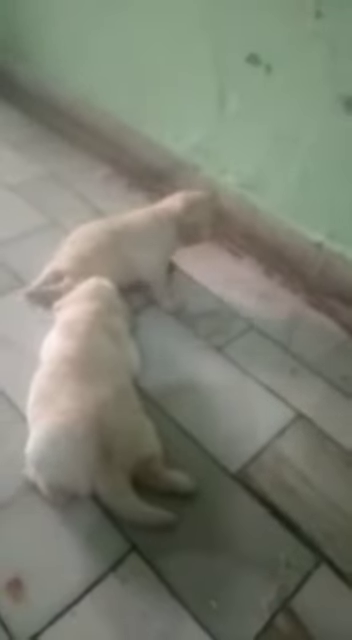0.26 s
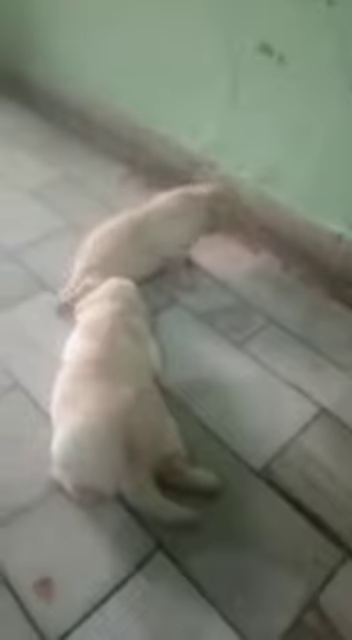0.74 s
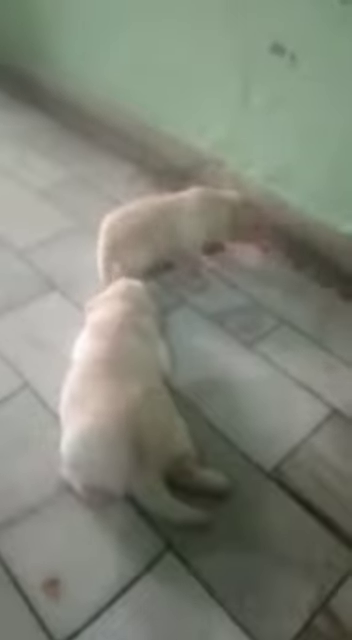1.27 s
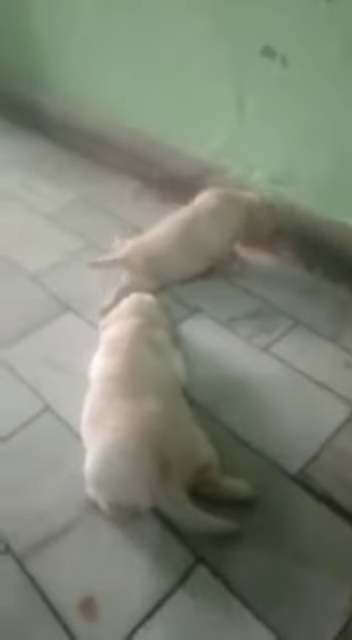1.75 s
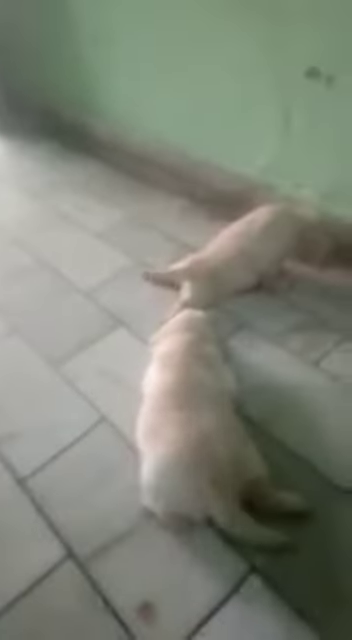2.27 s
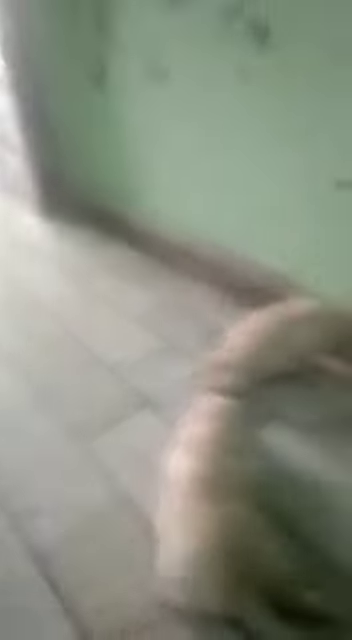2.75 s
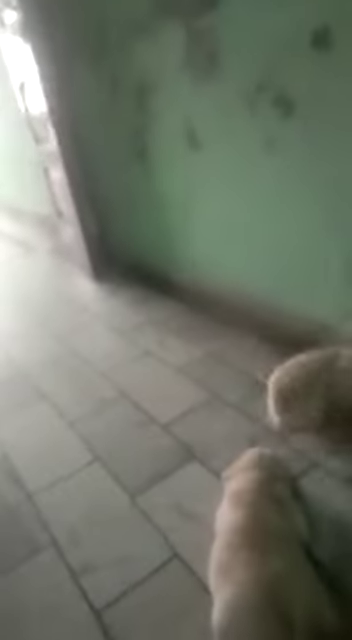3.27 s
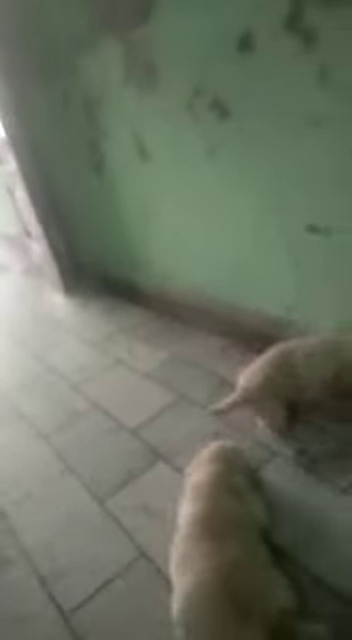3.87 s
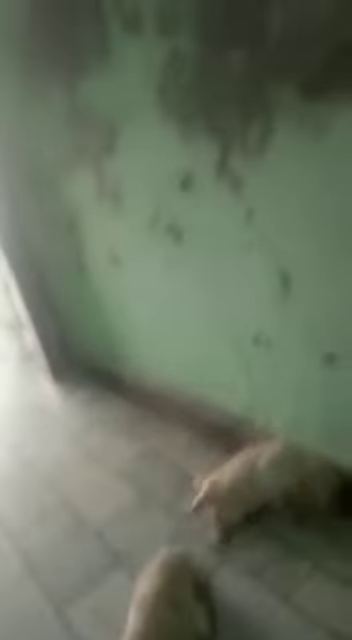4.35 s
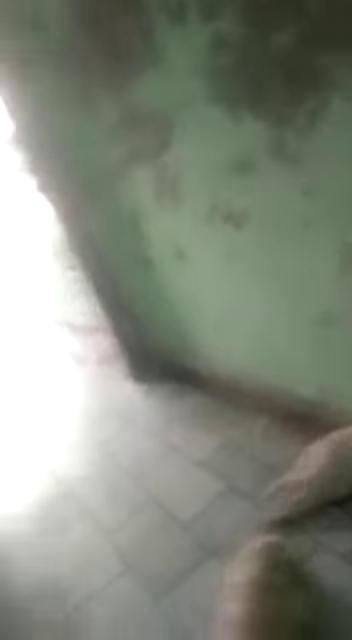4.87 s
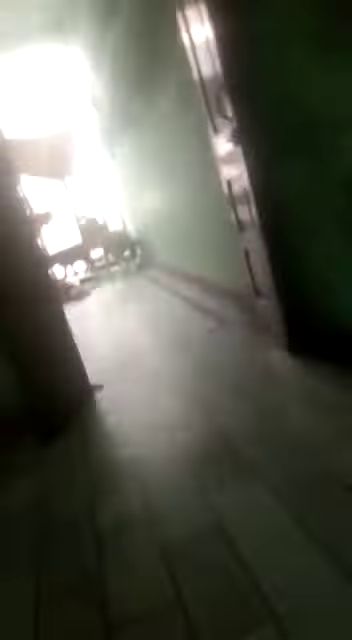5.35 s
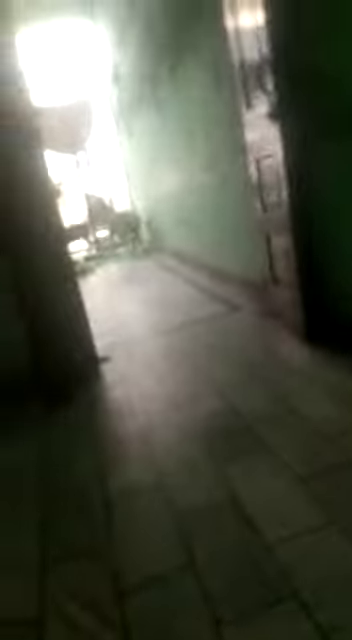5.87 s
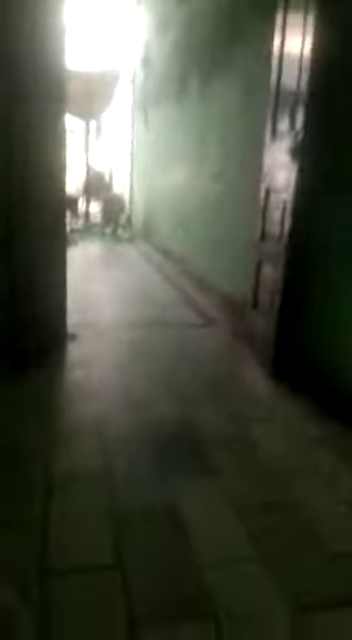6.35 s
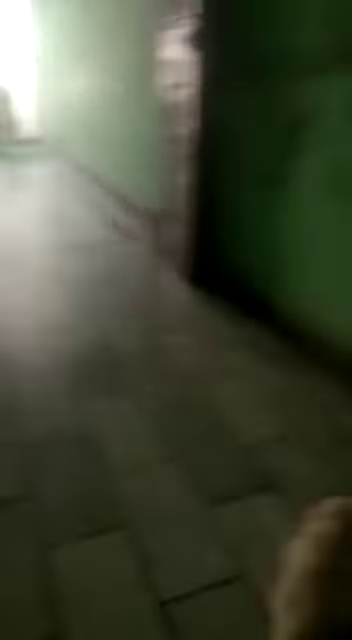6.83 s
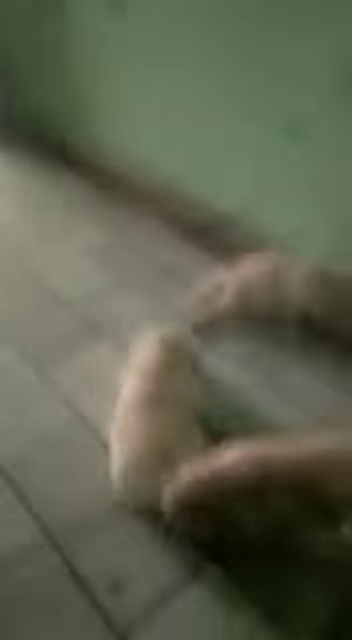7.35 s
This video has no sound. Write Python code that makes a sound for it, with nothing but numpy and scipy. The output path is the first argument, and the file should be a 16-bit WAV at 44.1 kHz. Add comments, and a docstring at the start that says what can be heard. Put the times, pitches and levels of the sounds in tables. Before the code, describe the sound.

Puppies yelp and whimper close by in an echoing room, over a low hum, with rustles and bumps on the microphone.

```python
"""Puppies yelp and whimper close by, over the low hum and hiss of a bare, tiled room.
Each cry rises and falls in pitch: vocal folds buzz a base note, and two resonances of the mouth
lift its overtones. Hard walls ring after the cries. A hand rubs and bumps the phone that hears them.
One squeal breaks into a rasp; later comes a long, wavering whine."""
import sys
import numpy as np
from scipy import signal
from scipy.fft import rfft, irfft, next_fast_len
from scipy.io import wavfile
from scipy.ndimage import uniform_filter1d, minimum_filter1d, map_coordinates

SR = 44100
rng = np.random.default_rng(int(sys.argv[2]) if len(sys.argv) > 2 else 0)


def dump_mix(stems):
    """Bounce the given channels to the path in sys.argv[1] as a 16-bit WAV at rate SR."""
    frames = np.atleast_2d(stems).T  # one column per channel
    limited = np.clip(frames, -1, 1)  # hard clip at full scale
    pcm = np.round(limited * 32767).astype(np.int16)
    wavfile.write(sys.argv[1], SR, pcm)


N = 335160  # 7.6 s


def amp(db):
    """Turn decibels into a gain."""
    return 10 ** (np.asarray(db) / 20)


def along(points, hz):
    """Read (hz, value) points at any frequency, on a log axis."""
    point_hz, values = np.transpose(points)
    return np.interp(np.log(hz + 1), np.log(point_hz), values)


def curves(rows, t):
    """Read each column after the first (time) at the times t."""
    times, *columns = np.transpose(rows)
    return [np.interp(t, times, column) for column in columns]


def arch(times, values, t):
    """A rounded (cubic) curve through the given points."""
    slope = np.gradient(values, times)
    i = np.clip(np.searchsorted(times, t) - 1, 0, len(times) - 2)
    span, step = times[i + 1] - times[i], values[i + 1] - values[i]
    part = np.clip((t - times[i]) / span, 0, 1)
    bend = (1 - part) * (slope[i] * span - step) - part * (slope[i + 1] * span - step)
    return values[i] + part * step + part * (1 - part) * bend


def wobble(rate, t):
    """A smooth curve through `rate` random points a second."""
    return map_coordinates(rng.standard_normal(2 ** 12), [(t - t[0]) * rate], mode="wrap")


def filtered(x, response):
    """Scale each frequency in x by response(hz)."""
    size = next_fast_len(len(x) + SR // 2)
    return irfft(rfft(x, size) * response(np.fft.rfftfreq(size, 1 / SR)), size)[:len(x)]


def noise(spectrum):
    """Noise shaped by (hz, db) points, then scaled to rms 1."""
    x = filtered(rng.standard_normal(N), lambda hz: amp(along(spectrum, hz)))
    return x / np.sqrt(np.mean(x ** 2) + 1e-20)


def add(track, start_s, sound):
    """Mix a sound into the track, cutting off what falls outside."""
    start = round(start_s * SR)
    sound, start = sound[max(-start, 0):], max(start, 0)
    track[start:start + len(sound)] += sound[:max(N - start, 0)]


def resonance(hz, centre_hz, width_hz):
    """A mouth resonance gives most of its power to the nearest overtones."""
    gain = 1 / (1 + ((hz - centre_hz) / width_hz) ** 2)
    return gain / np.linalg.norm(gain, axis=0)


def mouth(overtone_hz, base_db, lower_db, upper_db, upper_hz, lower_hz=1760, valley_hz=3500):
    """Overtone gains: a wider mouth favours them over the base note and raises the lower resonance."""
    opening_db = np.clip(lower_db - base_db, -8, 25)
    lower = resonance(overtone_hz, lower_hz + 30 * opening_db, width_hz=530)
    upper = resonance(overtone_hz, upper_hz, width_hz=0.11 * upper_hz)
    upper /= 1 + (valley_hz / overtone_hz) ** 20  # cut off below the valley between the two
    # a narrow ring between them catches any overtone that glides through it
    middle = amp(-8) / (1 + ((overtone_hz - 3950) / 140) ** 2)
    gains = amp(lower_db) * lower + amp(upper_db) * (middle + upper)
    return gains / (1 + (overtone_hz / (1.78 * upper_hz)) ** 4.3)  # the highest overtones die away


def voice(t, pitch_hz, base_db, lower_db, upper_db, upper_hz, rough, waver=0.0048, swell_db=2.5):
    """Vocal folds buzz at a slightly unsteady pitch; strain makes their cycles uneven."""
    unsteady_hz = pitch_hz * (1 + waver * wobble(161.6, t) + 0.066 * rough * wobble(900, t))
    harmonics = np.arange(1, 11)[:, None]  # 1 is the base note, the rest are overtones
    overtone_gains = mouth(harmonics[1:] * unsteady_hz, base_db, lower_db, upper_db, upper_hz)
    gains = np.vstack([amp(base_db), overtone_gains])
    # the throat delays each harmonic differently
    phase = 2 * np.pi * (harmonics * np.cumsum(unsteady_hz) / SR + rng.random(harmonics.shape))
    # each swells and fades on its own; fast flutter fills the gaps between them
    swell = amp([swell_db * wobble(68.4, t) for _ in harmonics])
    flutter = np.array([wobble(600, t) + 1j * wobble(600, t) for _ in harmonics])
    tones = swell * (1 + rough * np.minimum(harmonics / 2, 1) * flutter) * np.exp(1j * phase)
    from_edge_s = np.minimum(t - t[0], t[-1] - t)
    fade = np.sin(np.pi / 2 * np.clip(from_edge_s / .012, 0, 1)) ** 2
    return np.sqrt(2) * fade * np.sum(gains * tones.real, axis=0)


def yelp(length_s, attack_s, first_hz, top_hz, rise_s, hold_s, sag_s,
         base_db, lower_db, upper_db, base_fade, upper_fade, upper_hz, rough, rest_hz=631):
    """Pitch shoots up, holds and sags; the cry starts harsh, swells, then dulls as the mouth closes."""
    t = np.arange(round(length_s * SR)) / SR
    tense_hz = top_hz - (top_hz - first_hz) * np.clip(1 - t / rise_s, 0, 1) ** 2.05
    tension = 1 / (1 + (np.maximum(t - rise_s - hold_s, 0) / sag_s) ** 2)
    pitch_hz = rest_hz + (tense_hz - rest_hz) * tension  # slack vocal folds buzz at rest_hz
    starting = np.clip(1 - t / attack_s, 0, 1) ** 2
    closing_s = np.maximum(t - attack_s, 0)
    base = base_db - 14.5 * starting - base_fade * closing_s
    lower = lower_db - 12 * starting - 0.51 * upper_fade * closing_s
    upper = upper_db - 19 * starting - upper_fade * closing_s
    return voice(t, pitch_hz, base, lower, upper, upper_hz, rough + .22 * starting)


def yelps():
    """The puppies' short cries, one after another."""
    # One cry a row; base is the base note, lower and upper are the mouth's resonances:
    # start_s, length_s, attack_s, first_hz, top_hz, rise_s, hold_s, sag_s, base_db, lower_db,
    # upper_db, base_fade_db_per_s, upper_fade_db_per_s, upper_hz, roughness_0_to_1
    cries = [ (-.05, 0.089, 0.041, 895, 1002, 0.044, 0.0084, 0.14, -26, -23.5, -27.5, 450, 210, 5740, 0.37),
             (.505, 0.11, 0.037, 747, 786, 0.0081, 0.0064, 0.012, -39, -49, -48, 20, 20, 5500, 0.43),
             (.772, 0.081, 0.027, 748, 785, 0.069, 0.012, .1, -26.5, -41, -40, 23, 92, 5970, 0.17),
             (1.057, 0.14, 0.011, 812, 1150, 0.067, 0.0032, 0.033, -30.5, -42.5, -42, 3.7, 10, 5840, 0.1),
             (1.353, .24, 0.04, 784, 1319, 0.074, 0.0041, 0.092, -22.5, -14.5, -10.5, 33, 230, 5700, 0.036),
             (1.754, 0.29, 0.061, 783, 1223, 0.11, 0.0019, .073, -29, -18, -15, 6.9, 275, 5610, 0.089),
             (2.562, 0.11, 0.052, 846, 1359, 0.098, .005, .12, -24.5, -13.5, -16.5, 13, 330, 5580, .09),
             (2.874, 0.14, 0.039, 800, 1381, 0.089, 0.024, 0.072, -27, -15, -14, 8, 128, 5790, 0.12),
             (3.239, 0.28, 0.078, 697.6, 1398, 0.1, 0.093, 0.023, -21, -32.5, -22.5, 58, 280, 4750, 0.18),
             (4.3, 0.18, 0.047, 727, 860, .05, 0.0035, 0.06, -28, -31, -34, 4.4, 123, 5340, 0.23),
             (4.655, 0.192, 0.071, 1103, 1523, 0.11, 0.043, .06, -10, -20, -19, 250, 98, 4500, 0.034),
             (5.021, 0.17, 0.053, 807, 1428, 0.057, 0.038, 0.11, -10.5, -13.5, -21.5, 380, 127, 4140, 0.13),
             (5.348, 0.1137, 0.054, 1175, 1470, .067, 0.0011, .055, -20.5, -17, -38.5, 190, 20, 4950, 0.14),
             (5.905, 0.24, 0.047, 1163, 1643, 0.14, 0.037, 0.17, -14.5, -16, -14.5, 45, 187, 5050, .11),
             (6.33, 0.167, 0.026, 793, 943, 0.043, .005, 0.08, -24, -41, -50, 180, 23, 4270, 0.51), ]
    track = np.zeros(N)
    for start_s, *shape in cries:
        add(track, start_s, yelp(*shape))
    return track


def room(x, ring_s=0.51, tail_db=-5, early_db=-9, gap_s=0.0071):
    """Floor and near walls send back a few sharp echoes, then the bare room rings."""
    t = np.arange(SR * 3 // 4) / SR
    tail = rng.standard_normal(len(t)) * amp(-60 * t / ring_s) * (t > gap_s)
    walls = np.zeros(len(t))
    walls[(rng.uniform(.002, .025, size=8) * SR).astype(int)] = rng.choice([-1, 1], size=8)
    echoes = amp(tail_db) * tail / np.linalg.norm(tail) + amp(early_db) * walls / np.linalg.norm(walls)
    return signal.fftconvolve(x, echoes)[:N]


def hand_rustle(uneven_db=0.5, grain_db=1.0):
    """A hand rubs on the phone: a bright, grainy handling rustle that swells and sinks."""
    # Rubs of the hand on the phone: start_s, length_s, level_db
    rubs = [(-.15, 0.73, -37.5), (0.531, 0.19, -41.5), (0.865, 0.66, -35.5), (2.013, 0.57, -30.5),
            (2.48, .42, -35.5), (3.121, 0.68, -34.5), (3.613, 0.56, -46)]
    # Tone of the rustle: frequency_hz, relative_db
    rustle_tone = [(3500, -12.5), (6500, -3), (9000, -23), (14000, -10)]
    t = np.arange(N) / SR
    rubbing = sum(amp(level_db) * np.sin(np.pi * np.clip((t - start_s) / length_s, 0, 1))
                  for start_s, length_s, level_db in rubs)
    texture = amp(-uneven_db * wobble(6.9, t) + grain_db * wobble(300, t))
    return rubbing * texture * noise(rustle_tone)


def background(hum_hz=129, hum_db=-10):
    """The room rumbles, with a wavering hum and a hiss."""
    # Background loudness: time_s, rumble_db, hiss_db
    levels = [(.35, -39, -54.5), (.7, -39, -47), (1.1, -40, -56.5), (1.65, -39.5, -49.5), (2.4, -35.5, -40),
              (3.05, -40, -43), (3.5, -38.5, -36), (4.2, -40, -40), (4.55, -38, -42.5), (4.8, -45.5, -43.5),
              (5.25, -43, -46), (5.4, -37, -42.5)]
    # Tone of the rumble: frequency_hz, relative_db
    rumble_tone = [(30, -42.5), (45, -41.5), (75, -4), (120, -4), (280, -0.5), (550, -3.5), (900, -3),
                   (2000, -12.5), (9000, -48)]
    # Tone of the hiss: frequency_hz, relative_db
    hiss_tone = [(300, -27), (1000, -3.5), (2700, 1.5), (6300, -8.5), (8000, -28), (12000, -26.5)]
    t = np.arange(N) / SR
    rumble_db, hiss_db = curves(levels, t)
    hum = np.sqrt(2) * np.sin(2 * np.pi * hum_hz * t + 0.26 * wobble(10, t))
    hum *= amp(hum_db + 3.9 * wobble(13.0, t))  # relative to the rumble
    rumble = amp(rumble_db + wobble(11, t)) * (noise(rumble_tone) + hum)
    hiss = amp(hiss_db + wobble(17, t)) * noise(hiss_tone)
    return rumble + hiss


def bumps(rise_s=0.0015, click_s=0.028):
    """A soft knock on the phone is one low swing that dies at once, with a short click on top."""
    # Bumps and taps: start_s, thud_hz, thud_db, click_db
    knocks = [(0.561, 342, -25.5, -27), (2.194, 235, -18, -55), (2.36, 288, -22.5, -43),
              (2.574, 255, -25, -41), (2.845, 193, -24, -53), (7.228, 200, -38, -23),
              (7.246, 109, -10, -23)]
    track = np.zeros(N)
    t = np.arange(SR // 10) / SR
    for start_s, thud_hz, thud_db, click_db in knocks:
        swing = np.gradient(np.sin(2 * np.pi * thud_hz * t) * t * np.exp(-t / rise_s))
        click = amp(click_db - 60 * t / click_s) * rng.standard_normal(len(t))
        add(track, start_s, click - amp(thud_db) * swing / np.abs(swing).max())
    return track


def squeal(break_s=2.24, upper_hz=6100):
    """A thin, pressed cry, nearly all overtones; it rasps once the vocal folds lose their regular beat."""
    # Path of the squeal: time_s, pitch_hz, level_db
    path = [(2.16, 865, -34), (2.194, 876, -26.5), (2.235, 857, -23.5), (2.291, 961, -25.5),
            (2.44, 782, -39.5)]
    times, pitch_hz, _ = np.transpose(path)
    t = np.arange(times[0], times[-1], 1 / SR)
    _, level_db = curves(path, t)
    rough = np.where(t < break_s, 0.064, 0.45)
    glide_hz = arch(times, pitch_hz, t)
    return times[0], voice(t, glide_hz, level_db - 27, level_db - 3, level_db, upper_hz, rough)


def whine(upper_hz=5240, rough=0.28):
    """A soft, drawn-out cry whose pitch climbs and sinks twice."""
    # Path of the whine: time_s, pitch_hz, base_db, lower_db, upper_db
    path = [(3.635, 696.3, -25, -35, -40), (3.69, 1113, -35, -45, -34), (3.756, 862, -29.5, -32.5, -33),
            (3.924, 1236, -33.5, -49, -43), (3.98, 1113, -31, -37, -35.5), (4.049, 875, -23.5, -36.5, -39),
            (4.132, 687, -32, -39.5, -41)]
    times, pitch_hz = np.transpose(path)[:2]
    t = np.arange(times[0], times[-1], 1 / SR)
    _, base_db, lower_db, upper_db = curves(path, t)
    return times[0], voice(t, arch(times, pitch_hz, t), base_db, lower_db, upper_db, upper_hz, rough)


def scene(direct_db=-1.5, turned_db=-4.5, turn_s=4.88):
    """Everything in the room; as the phone swings away, the cries weaken and the echo grows."""
    cries = yelps()
    add(cries, *whine())
    add(cries, *squeal())
    knocks = bumps()
    turned = .5 + .5 * np.tanh(10 * (np.arange(N) / SR - turn_s))
    direct = amp(direct_db + turned_db * turned) * cries + knocks
    echo = amp(-.5 * turned_db * turned) * room(cries + .5 * knocks)
    return (direct + echo + hand_rustle() + background())[None]


def record(dry):
    """The phone's microphone loses the high treble; a limiter holds the loudest yelps down."""
    # Tone of the microphone: frequency_hz, gain_db
    microphone = [(800, -3), (1030, -5), (1300, 0), (8050, 0.5), (8800, -8), (10500, -10), (13000, -29.5)]
    ceiling, window, top_hz = .78, SR // 100, 15500
    heard = filtered(dry[0], lambda hz: amp(along(microphone, hz)))
    needed_gain = np.minimum(1, ceiling / (np.abs(heard) + 1e-9))
    smooth_gain = uniform_filter1d(minimum_filter1d(needed_gain, size=window), size=window)
    return filtered(heard * smooth_gain, lambda hz: hz < top_hz)[None]


dry = scene()
out = record(dry)
dump_mix(out)
```